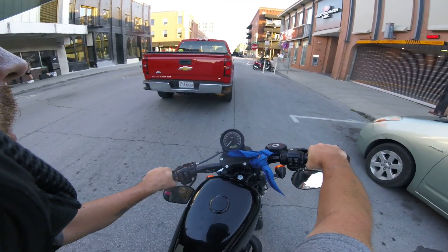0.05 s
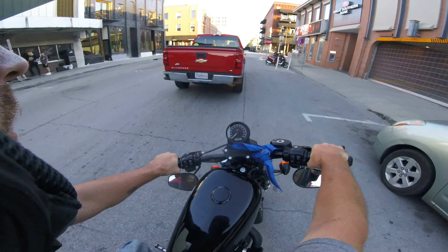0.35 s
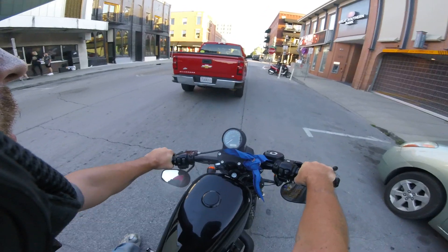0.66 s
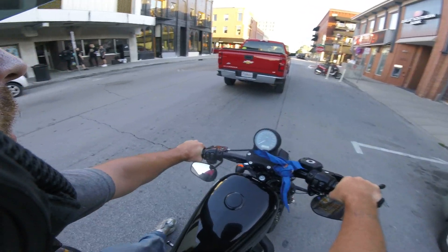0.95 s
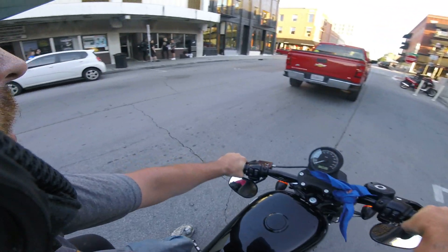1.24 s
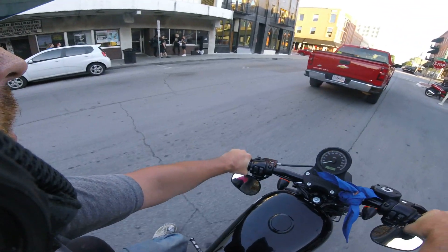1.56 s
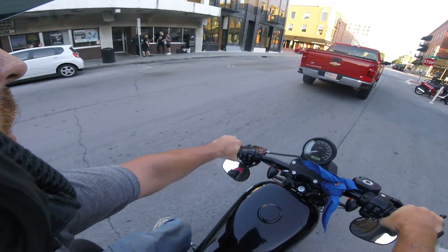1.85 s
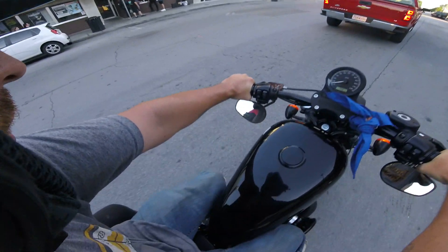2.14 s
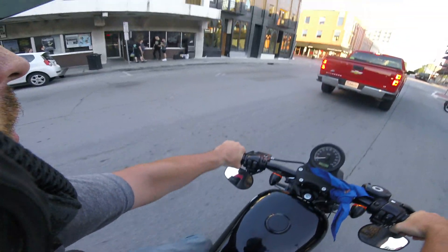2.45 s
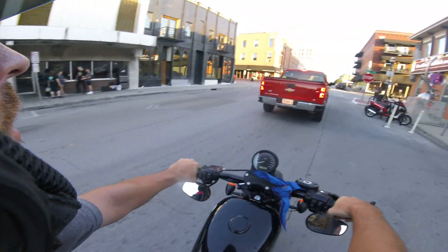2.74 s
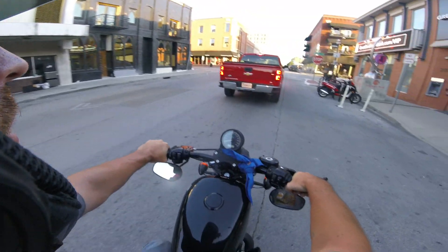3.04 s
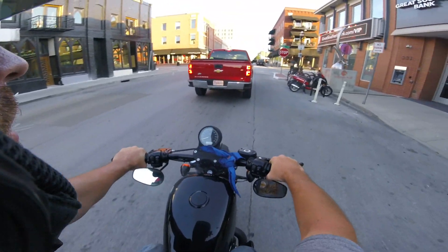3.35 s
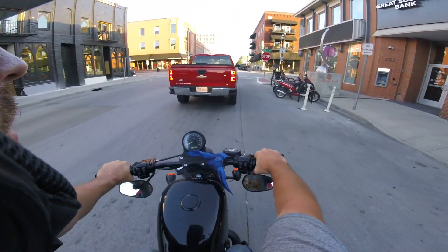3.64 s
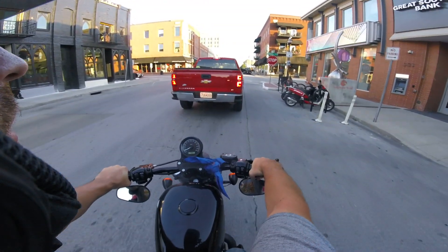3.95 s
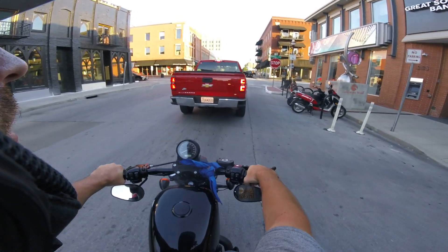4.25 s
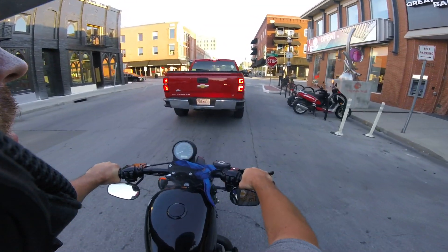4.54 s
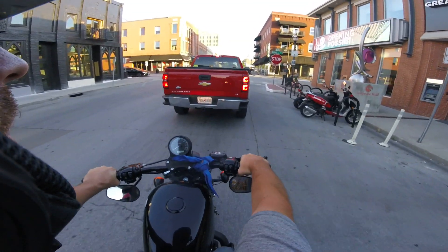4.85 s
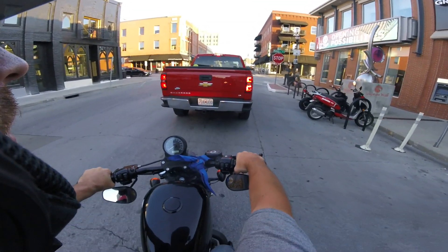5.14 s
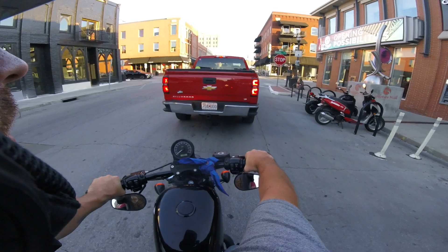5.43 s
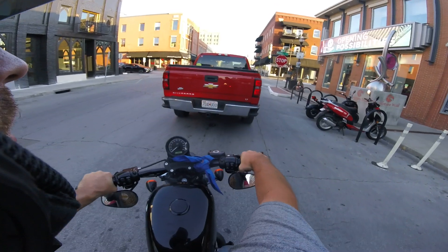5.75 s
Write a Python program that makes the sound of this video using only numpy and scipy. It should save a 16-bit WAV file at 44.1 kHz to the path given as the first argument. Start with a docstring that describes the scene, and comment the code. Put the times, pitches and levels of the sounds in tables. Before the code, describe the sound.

A V-twin motorcycle is heard close up from the saddle, moving slowly along a town street. From the start it pulls gently with a quick, deep, thumping exhaust beat, easing down in speed over the first two seconds, with spits of gas and a soft rustle of drive and tyres. At about 2.4 seconds the throttle shuts and the engine drops to a quieter, slower, loping idle. One cylinder misfires between catches, and the valves tick faintly. Near 3 seconds a light breeze starts rumbling on the microphone, with one short gust just after. The idle gradually firms up until about 4.5 seconds, with sharper knocks around 3.9 and 4.2 seconds, then keeps chugging unevenly. A faint high squeak comes at about 5.9 seconds, right at the end. Building fronts add a slight dull echo to the engine throughout.

```python
"""A V-twin motorcycle heard from the saddle, with house fronts echoing and air on the microphone.
First it pulls gently: each exhaust stroke is a thump that glides up as the piston shrinks the cylinder,
gas spits, the shut pipe rings on, the drive rustles. At 2.35 s the throttle shuts and it lopes at idle:
valves tick, the rear cylinder misfires between catches. A breeze sets in near 3 s with one gust.
A faint high squeak comes at the end."""
import sys
import numpy as np
from scipy import signal
from scipy.fft import rfft, irfft, next_fast_len
from scipy.io import wavfile
from scipy.ndimage import uniform_filter1d

SR = 44100
rng = np.random.default_rng(int(sys.argv[2]) if len(sys.argv) > 2 else 0)


def waveform_to_disk(signal):
    """Save audio, clipped to [-1, 1], as 16-bit WAV at the path in sys.argv[1]."""
    frames = np.transpose(np.atleast_2d(signal))
    scaled = np.clip(frames, -1, 1) * 32767
    samples = np.round(scaled).astype(np.int16)
    wavfile.write(sys.argv[1], SR, samples)


N = 264159
TIME = np.arange(N) / SR
SHUT_S, CRUISE_HZ = 2.35, 13.5  # throttle shuts; cruising four-stroke cycle rate
REAR_LAG_CYCLES = 315 / 720

# Engine speed. Each row: time in seconds, four-stroke cycles per second.
PULL_CYCLE_HZ = [(0, 17.24), (.27, 17.56), (.55, 15.22), (.8, 14.1), (1.1, 14.18), (1.45, 13.43),
                 (1.8, 13.21), (2.02, 12.64), (2.35, 13.18)]
IDLE_CYCLE_HZ = [(2.4, 9.532), (2.55, 8.064), (2.83, 8.636), (4.03, 8.424), (4.47, 8.814), (4.65, 8.305),
                 (5.36, 8.082), (5.79, 8.449), (5.83, 8.79)]
# Charge builds as the idle settles. Each row: time in seconds, blowdown strength 0-1.
IDLE_CHARGE = [(2.4, 0.25), (2.52, 0.32), (3.0, .38), (3.6, 0.48), (4.4, .61), (5.99, 0.59)]
# Rear firings at idle. Each row: time in seconds, blowdown strength 0-1, knock level in dB.
REAR_CATCHES = [(2.369, .2, -34.5), (2.553, 0.23, -39), (2.794, 0.42, -43), (3.025, 0.29, -37),
                (3.258, 0.33, -41.5), (3.494, 0.45, -37), (3.85, 0.48, -25.5), (4.204, 0.59, -25),
                (4.547, 0.59, -35.5), (4.782, .47, -33.5), (5.027, 0.65, -36), (5.268, 0.51, -33.5),
                (5.394, .41, -46), (5.638, 0.6, -37), (5.877, 0.7, -30)]
# Noise spectra. Each row: frequency in Hz, relative density in dB.
CRACK_SPECTRUM = [(600, -3.5), (1200, -1), (2100, -6), (3000, 0), (5000, -1), (6600, -3), (7600, -12.5),
                  (10000, -19), (12500, -35)]
KNOCK_SPECTRUM = [(200, 15), (320, 2), (500, -11.5), (640, -2), (820, 6), (1000, -12.5), (1600, -16.5),
                  (3000, -28)]
IDLE_DRIVE_SPECTRUM = [(240, -35.5), (400, -6.5), (487, 1.5), (601, -8.5), (784, -2), (928, -15),
                       (1110, -10.5), (1630, -21.5), (2510, -17.5), (3020, -17), (4170, -23), (6530, -23),
                       (7200, -29), (10700, -41), (11400, -59.5), (14900, -80.5), (22000, -120)]


def stroke(t, cycle_s, blow, cylinder, pipe, bend, fade, attack_s, closing):
    """Pipe and cylinder swing together, ever faster as the piston rises, until the valve shuts."""
    # Modes struck by the blowdown. Each row: frequency in Hz, width in Hz, signed gain.
    open_pipe = [(290.7, 23.7, -0.21), (489, 45, 0.098), (787, 61, 0.069)]
    open_hz, shut_hz, open_share, swell, shut_kick, open_kick, overtone = cylinder
    open_s = open_share * cycle_s
    travel = np.clip(t / open_s, 0, 1.4)
    turns = open_hz * t + (shut_hz - open_hz) * open_s * travel ** bend / bend
    valve = step(t / attack_s + .39) * step((1 - travel) / closing)
    swing = -np.cos(2 * np.pi * turns) * valve * (blow * np.exp(-fade * travel) + swell * travel ** 2)
    lift = np.sin(np.pi * np.minimum(travel, 1)) ** 4
    rasp = -overtone * blow * lift * np.cos(6 * np.pi * turns)  # full lift sharpens the wave
    return swing + rasp + shut_kick * ring(t - open_s, pipe) + open_kick * blow * ring(t, open_pipe)


def pull_firings():
    """Front and rear firing times under throttle; the rear lags by 315 crank degrees."""
    phase = .55 + np.cumsum(curve(PULL_CYCLE_HZ, TIME)) / SR
    cycles = np.arange(1, int(np.interp(SHUT_S, TIME, phase)) + 1)
    front_s = np.interp(cycles, phase, TIME)
    rear_s = np.interp(cycles - 1 + REAR_LAG_CYCLES, phase, TIME, left=-.006)
    return front_s, rear_s


def pull_thumps(front_s, rear_s):
    """Both cylinders fire hard; the pipe rings out as the throttle shuts."""
    # Pipe modes. Each row: frequency in Hz, width in Hz, gain.
    hot_pipe = [(145.6, 42, 1), (290, 45, .15)]
    ring_out = [(350, 12, 0.096)]
    front = (73.7, 138, .35, -.45, .42, .7, .25)  # cylinder fields: see stroke()
    rear = (108, 200, .48, -.95, .22, .5, .015)
    thumps = ring(TIME - SHUT_S, ring_out)
    for times, cylinder, trim in ((front_s, front, (0, 0)), (rear_s, rear, (-1.63, .5))):
        for s, chance in zip(times, rng.standard_normal(len(times))):
            i, t = around(s, length_s=.11)
            cycle_hz = curve(PULL_CYCLE_HZ, s)
            heat = (cycle_hz / CRUISE_HZ) ** .21  # hotter gas raises the pitch
            thump = stroke(heat * t, heat / cycle_hz, 1 + .05 * chance, cylinder, hot_pipe,
                           bend=2.15, fade=.05, attack_s=.0011, closing=.2)
            thumps[i] += thump * undb(speed_db(s, -4.5, .071) + speed_db(s, *trim))
    return thumps


def pull_gas(front_s, rear_s):
    """Gas cracks at each blowdown and roars in the pipe; a hollow knock leads each rear thump."""
    # Each row: delay in seconds, decay in seconds, gain in dB.
    crack_spits = [(-.0025, 0.0074, -1.5), (.0045, 0.00598, 4.5)]
    roar_spits = [(.004, 0.024, 0)]
    knock_spits = [(-0.009, 0.0087, 1.8)]
    # Each row: frequency in Hz, relative density in dB.
    roar_spectrum = [(170, -0.5), (230, 9.5), (380, -6), (480, -10), (600, -16.5), (1200, -22.5)]
    times = np.sort(np.r_[front_s, rear_s])
    crack_db = speed_db(times, -34.5, -.53) + 2 * rng.standard_normal(len(times))
    roar_db, knock_db = speed_db(times, -29, 2.63), speed_db(rear_s, -25.5, -1.1)
    crack = bursts(times, crack_db, crack_spits, CRACK_SPECTRUM, tint_db=4.5, rise_s=.0006)
    roar = bursts(times, roar_db, roar_spits, roar_spectrum, tint_db=3.5, rise_s=.0017)
    knock = bursts(rear_s, knock_db, knock_spits, KNOCK_SPECTRUM, tint_db=3.5, rise_s=.0014)
    return crack + roar + knock


def idle_strokes():
    """Times, strengths and cylinders at idle, rear and front in turn; a misfire only pushes gas out."""
    # Each: opening Hz, shutting Hz, open share of cycle, late swell, shut kick, open kick, overtone gain.
    misfire = (96.7, 158, 0.41, 0.1058, 0.0634, -0.02, .013)
    front = (78.7, 144.2, .291, .25, .21, .29, .055)
    rear = (95.7, 184, .273, .16, .076, .4, .013)
    misfire_share, scatter_db, front_misfire_s = .48, 4, 3.2
    fronts = [2.397]
    while fronts[-1] < TIME[-1]:
        fronts.append(fronts[-1] + 1 / curve(IDLE_CYCLE_HZ, fronts[-1]))
    fronts = np.array(fronts[:-1])
    rears = np.r_[2.369, fronts[:-1] + REAR_LAG_CYCLES * np.diff(fronts)]
    strokes = []
    for front_s, rear_s, chance in zip(fronts, rears, rng.standard_normal((len(fronts), 2))):
        weak = misfire_share * curve(IDLE_CHARGE, rear_s) * undb(scatter_db * chance[0])
        caught = [(s, blow, rear) for s, blow, _ in REAR_CATCHES if abs(s - rear_s) < .03]
        strokes += caught or [(rear_s, weak, misfire)]
        share = misfire_share if abs(front_s - front_misfire_s) < .03 else 1
        strokes.append((front_s, share * curve(IDLE_CHARGE, front_s) * (1 + .068 * chance[1]), front))
    return zip(*strokes)


def idle_thumps(times, blows, cylinders):
    """Uneven exhaust strokes with the throttle shut."""
    # Modes struck by the closing valve. Each row: frequency in Hz, width in Hz, signed gain.
    idle_pipe = [(112.94, 5.2, 0.77), (198, 93, -1.8), (332.3, 12.4, 0.36), (240, 65, -0.0043)]
    thumps = np.zeros(N)
    for s, blow, cylinder in zip(times, blows, cylinders):
        i, t = around(s, length_s=.16)
        cycle_s = (1 + .032 * rng.standard_normal()) / curve(IDLE_CYCLE_HZ, s)
        thumps[i] += stroke(t, cycle_s, blow, cylinder, idle_pipe,
                            bend=3.23, fade=.16, attack_s=.0012, closing=.13)
    return thumps


def idle_gas(times, blows):
    """Gas spits at each blowdown, growing as the 1.4th power of its strength."""
    # Each row: delay in seconds, decay in seconds, gain in dB.
    spits = [(-.002, 0.0052, 7), (.003, 0.085, -7)]
    # Each row: frequency in Hz, relative density in dB.
    spectrum = [(200, 6), (320, 5.5), (400, 4.5), (500, 2.5), (620, 5.5), (780, -0.5), (1000, 0.5),
                (1400, 2), (2000, .5), (2500, -5), (3300, -5), (5500, -14.5), (8000, -22), (12000, -29)]
    gas_db = -31 + 1.4 * 20 * np.log10(blows) + 1.2 * rng.standard_normal(len(times))
    gas_db[::2] -= 1.5  # rear strokes
    return bursts(times, gas_db, spits, spectrum, tint_db=4.5, rise_s=.0008)


def catches():
    """When the rear cylinder catches, it knocks in the pipe and cracks with a rattling tail."""
    # Each row: delay in seconds, decay in seconds, gain in dB.
    knock_spits = [(-.006, 0.011, 0)]
    crack_spits = [(-.002, .007, -9.5), (.004, 0.06, -18.5)]
    times, _, knock_db = np.transpose(REAR_CATCHES)
    knocks = bursts(times, knock_db, knock_spits, KNOCK_SPECTRUM, tint_db=5.5, rise_s=.00069)
    cracks = bursts(times, knock_db, crack_spits, CRACK_SPECTRUM, tint_db=4.5, rise_s=.00073)
    return knocks + cracks


def valve_ticks(times):
    """Valves tick as they land on their seats."""
    # Each row: delay in seconds, decay in seconds, level in dB.
    ticks = [(.038, 0.0057, -43)]
    scatter_db = 3 * rng.standard_normal(len(times))
    return bursts(times, scatter_db, ticks, IDLE_DRIVE_SPECTRUM, tint_db=6, rise_s=.00033)


def rustle():
    """Drive and tyres rustle in fine grains, brighter under load, with a thin metallic ring."""
    # Each row: frequency in Hz, relative density in dB.
    pull_spectrum = [(240, -25), (400, -8), (494, 2), (654, -6), (818, -2.5), (1010, -8), (1820, -15.5),
                     (2410, -17), (3020, -16), (4790, -19.5), (5440, -19.5), (6440, -18), (7200, -27),
                     (11000, -39), (11400, -47), (14900, -83.5), (22000, -120)]
    load = step((SHUT_S + .071 - TIME) / .058)
    grains = noise() * undb(1.4 * unit(uniform_filter1d(noise(), size=130)))
    hiss = load * colour(grains, pull_spectrum) + (1 - load) * colour(grains, IDLE_DRIVE_SPECTRUM)
    metal = undb(-30) * resonance(grains, hz=6500, width_hz=600)
    idle_db = -49.5 + 11.5 * curve(IDLE_CHARGE, TIME)
    return (hiss + metal) * undb(load * speed_db(TIME, -38, .57) + (1 - load) * idle_db)


def squeak(start_s=5.865, level_db=-51.5):
    """Light rubbing excites one high, narrow resonance."""
    return resonance(noise(), hz=6400, width_hz=200) * undb(level_db) * step((TIME - start_s) / .005)


def buffet(calm_db=-37, breeze_db=-25.5, breeze_s=2.8, gust_db=-19, gust_s=3.115):
    """Slow air tumbles over the microphone: calm, then a breeze with one gust."""
    air = colour(noise(), [(18, -8), (40, -6.5), (80, -4.5), (200, -13), (400, -26)])
    breeze = undb(calm_db) + undb(breeze_db) * step((TIME - breeze_s) / .083)
    gust = undb(gust_db) * np.exp(-((TIME - gust_s) / .038) ** 2)
    return air * (breeze + gust)


def street(x, t60_s, wet_db):
    """House fronts add a dull, scattered echo."""
    t = TIME[:SR // 2]
    echo = rng.standard_normal(len(t)) * undb(-60 * t / t60_s) * step((t - .025) / .0015)
    echo = signal.sosfilt(signal.butter(1, 3500, fs=SR, output="sos"), echo / np.linalg.norm(echo))
    return x + undb(wet_db) * signal.fftconvolve(x, echo)[:N]


def bursts(times, levels_db, spits, spectrum, tint_db, rise_s):
    """Short spits of noise at the given times, each randomly tinted."""
    size = 4096
    track, gain = np.zeros(N + 2 * size), unit(response(spectrum, size))
    t = np.arange(size) / SR - .004
    bin_place, knots = np.sqrt(np.linspace(0, 1, len(gain))), np.linspace(0, 1, 40)
    for delay_s, decay_s, spit_db in spits:
        envelope = step(t / rise_s) * np.exp(-np.maximum(t, 0) / decay_s) * undb(spit_db)
        for s, level_db in zip(times, levels_db):
            tint = undb(tint_db * np.interp(bin_place, knots, rng.standard_normal(len(knots))))
            hiss = irfft(rfft(rng.standard_normal(size)) * gain * tint)
            start = int((s + delay_s + t[0]) * SR) + size
            track[start:start + size] += (hiss * envelope * undb(level_db))[:len(track) - start]
    return track[size:size + N]


def speed_db(at_s, cruise_db, db_per_hz):
    """Level that follows engine speed under throttle."""
    return cruise_db + db_per_hz * (curve(PULL_CYCLE_HZ, at_s) - CRUISE_HZ)


def ring(t, modes):
    """Damped modes struck at t = 0."""
    t = np.maximum(t, 0)
    return sum(gain * np.sin(2 * np.pi * hz * t) * np.exp(-np.pi * width * t) for hz, width, gain in modes)


def resonance(x, hz, width_hz):
    """Two passes through one resonator, scaled to rms 1."""
    b, a = signal.iirpeak(hz, hz / width_hz, fs=SR)
    return unit(signal.lfilter(b, a, signal.lfilter(b, a, x)))


def colour(x, spectrum):
    """Filter by a (Hz, dB) spectrum and scale to rms 1."""
    size = next_fast_len(N)
    return unit(irfft(rfft(x, size) * response(spectrum, size), size)[:N])


def response(spectrum, size):
    """Gain per bin of a (Hz, dB) spectrum, falling steeply past its ends."""
    hz, db = np.transpose(spectrum)
    bin_hz = np.maximum(np.arange(size // 2 + 1) * SR / size, 1)
    skirts = 1 / (1 + (hz[0] / bin_hz) ** 4) / (1 + (bin_hz / hz[-1]) ** 4)
    return undb(np.interp(np.log(bin_hz), np.log(hz), db)) * skirts


def around(s, length_s):
    """Sample indices from 12 ms before s to length_s after, and their times from s."""
    i = np.arange(max(int((s - .012) * SR), 0), min(int((s + length_s) * SR), N))
    return i, i / SR - s


def curve(rows, at_s):
    """Interpolate (time, value) rows."""
    return np.interp(at_s, *np.transpose(rows))


def step(x):
    """Smooth rise from 0 to 1."""
    return .5 + .5 * np.tanh(x)


def noise():
    return rng.standard_normal(N)


def undb(db):
    return 10 ** (np.asarray(db) / 20)


def unit(x):
    return x / np.sqrt(np.mean(x ** 2))


def scene():
    """The engine between house fronts, with rustle, a squeak and moving air."""
    front_s, rear_s = pull_firings()
    pull = pull_thumps(front_s, rear_s) + pull_gas(front_s, rear_s)
    times, blows, cylinders = idle_strokes()
    idle = idle_thumps(times, blows, cylinders) + idle_gas(times, blows) + catches() + valve_ticks(times)
    engine = street(pull + idle, t60_s=.5, wet_db=-17)
    return (engine + rustle() + squeak() + buffet())[None]


def record(dry):
    """Drop the deepest bass, round the tallest peaks, cut the top."""
    low_cut_hz, top_hz, ceiling = 32.4, 11500, .85
    dry = signal.sosfilt(signal.butter(1, low_cut_hz, "high", fs=SR, output="sos"), dry)
    rounded = dry / (1 + (dry / ceiling) ** 6) ** (1 / 6)
    return signal.sosfilt(signal.ellip(8, .2, 70, top_hz, fs=SR, output="sos"), rounded)


dry = scene()
out = record(dry)
waveform_to_disk(out)
```